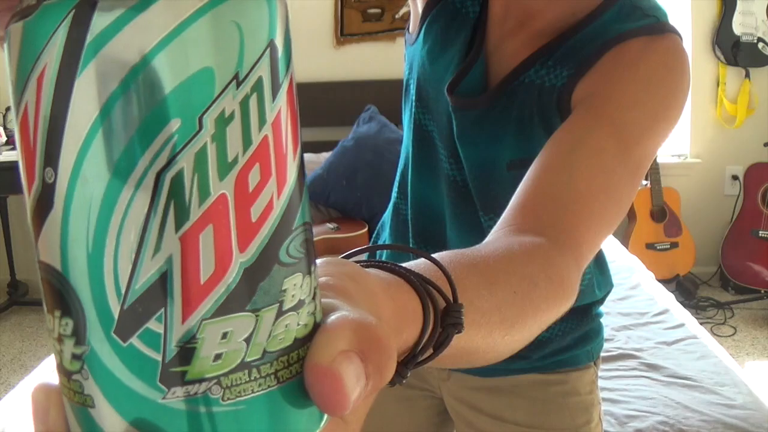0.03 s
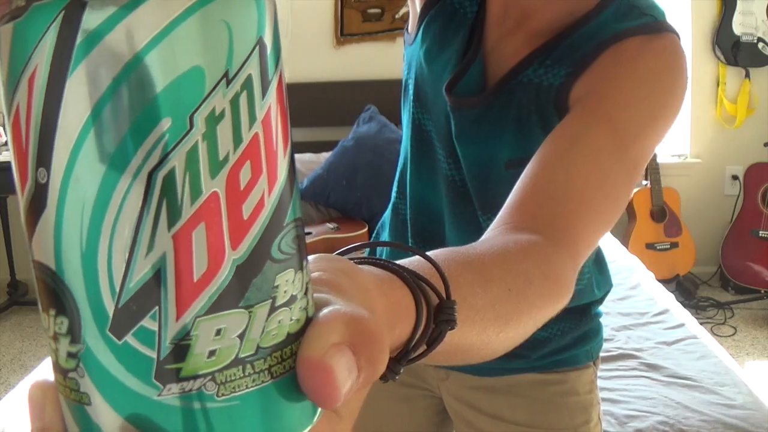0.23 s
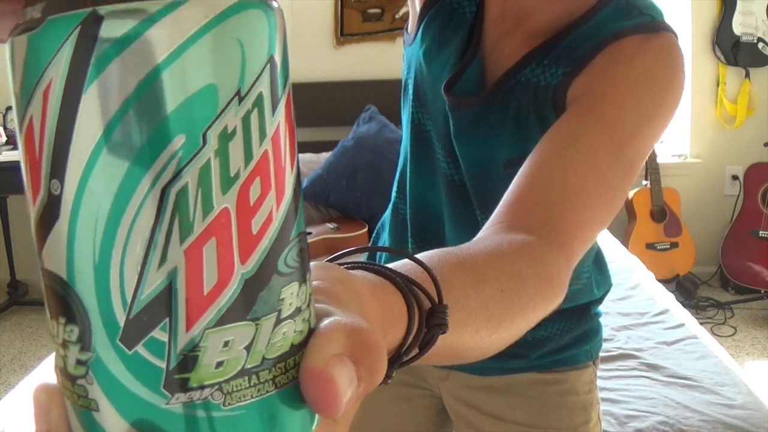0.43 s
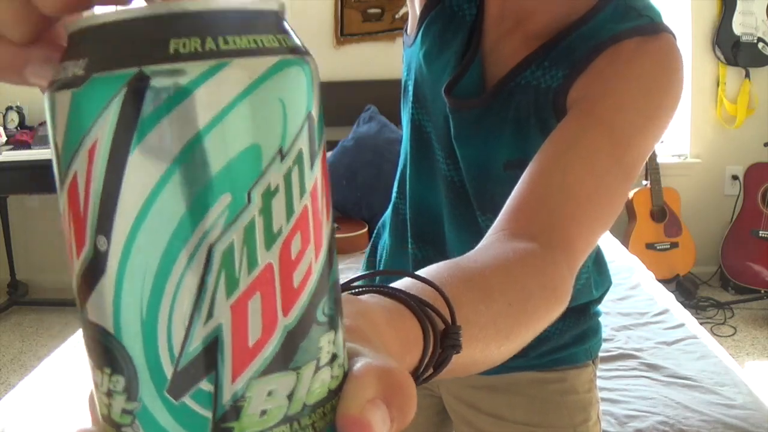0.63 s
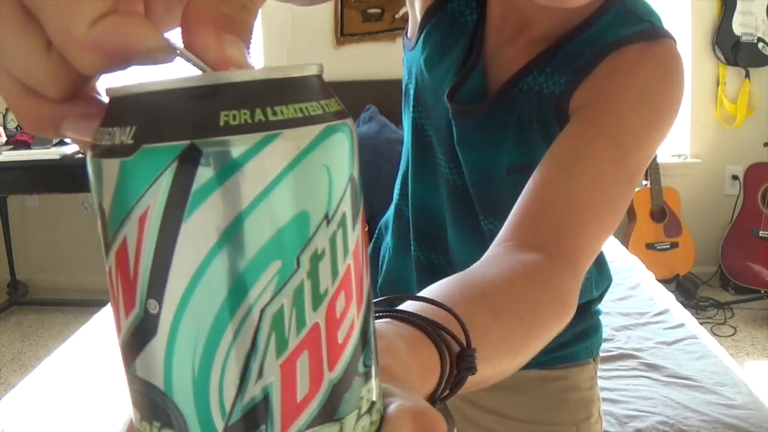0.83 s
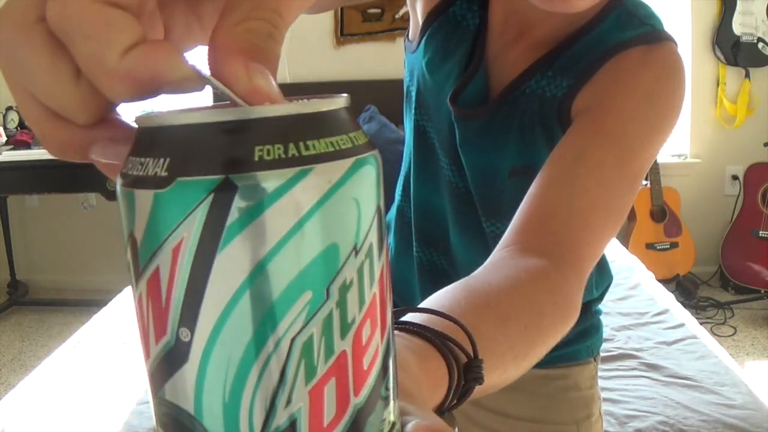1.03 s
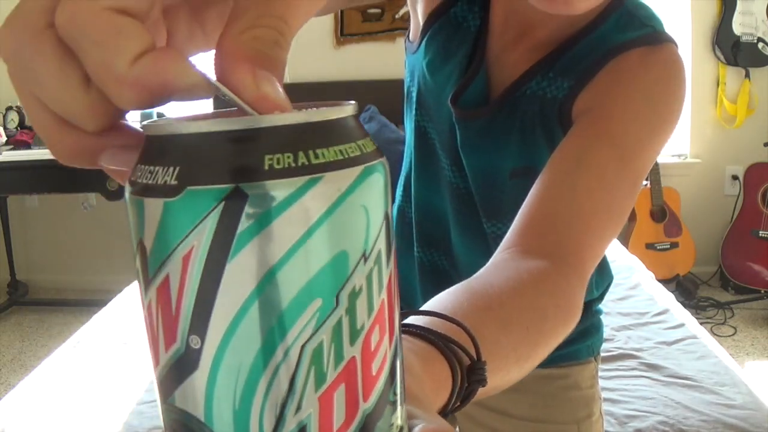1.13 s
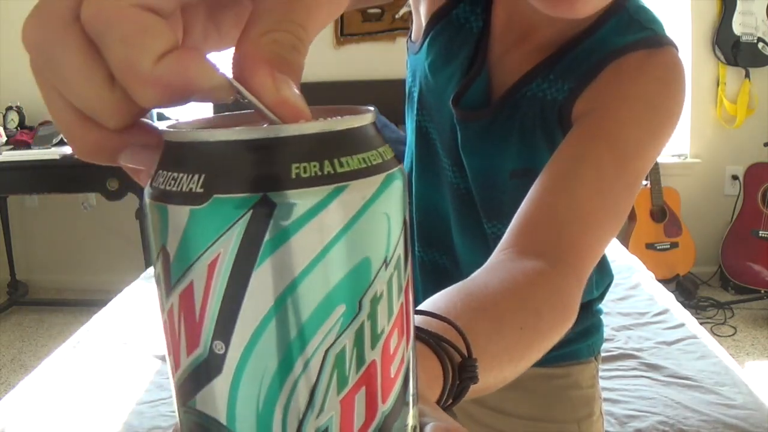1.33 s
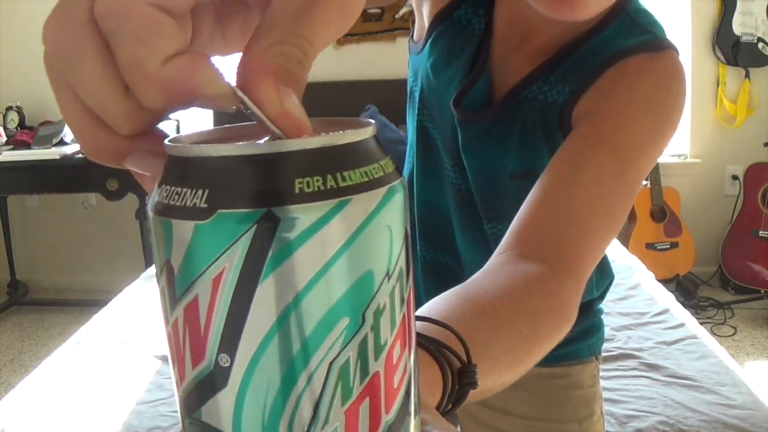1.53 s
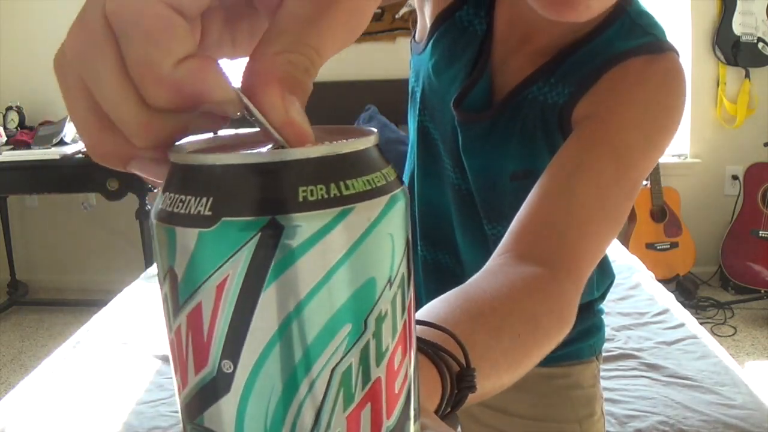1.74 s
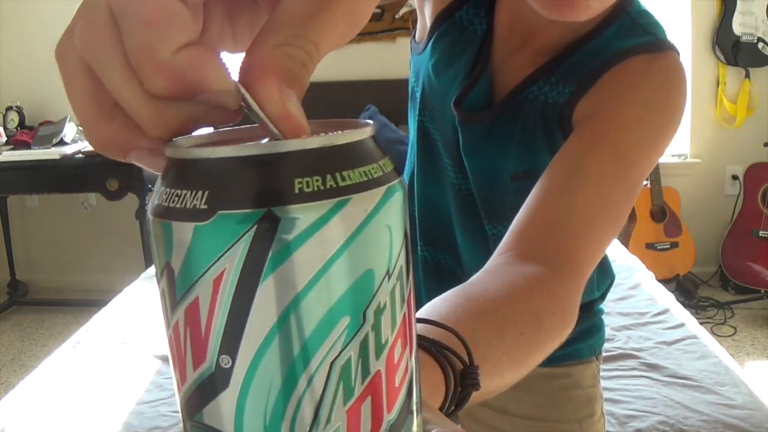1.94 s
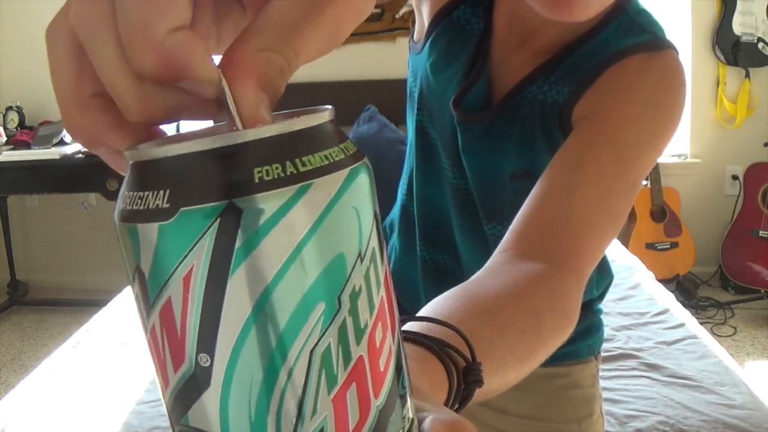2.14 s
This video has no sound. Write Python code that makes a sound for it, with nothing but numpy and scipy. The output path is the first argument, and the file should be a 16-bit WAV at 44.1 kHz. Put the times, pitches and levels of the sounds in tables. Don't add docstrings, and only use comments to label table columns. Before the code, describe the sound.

A soda can being opened: sharp metal tab clicks, a quick tearing crack, then hissing gas

```python
import sys
import numpy as np
from scipy import signal
from scipy.fft import rfft, irfft, next_fast_len
from scipy.io import wavfile
from scipy.ndimage import uniform_filter1d, map_coordinates

SR = 44100
rng = np.random.default_rng(int(sys.argv[2]) if len(sys.argv) > 2 else 0)


def volts_from_db(level):
    exponent = np.asarray(level, float) / 20
    return 10 ** exponent


def put_to_file(sound):
    columns = np.atleast_2d(sound).T
    safe = np.clip(columns, -1, 1)
    whole_steps = np.round(safe * 32767)
    wavfile.write(sys.argv[1], SR, whole_steps.astype(np.int16))


N = 96402

# [start_s, peak_db, tab_pitch_hz, treble_db, room_db]
NAIL_TICK = [
    (.1804, -40, 5300, -12, -19),
]
# [start_s, peak_db, tab_pitch_hz, treble_db, room_db]
TAB_LIFT = [
    (1.2494, -42.5, 4220, -6.5, -19),
    (1.3985, -2.5, 5800, -6.5, -11.5),
    (1.4706, -13.5, 5600, -6, -9),
    (1.5413, -21, 5450, -3, -10),
]
# [start_s, peak_db, tab_pitch_hz, treble_db, room_db]
RIVET_SNAP = [
    (1.4643, -1, 5630, 3, 2),
]
# [start_s, peak_db, tab_pitch_hz, treble_db, room_db]
TAB_BEND = [
    (1.7802, -6, 5150, 7, -5.5),
    (1.7884, -18.5, 5180, -2, 1.5),
    (1.8475, -16.5, 4130, -15, -24),
    (1.8533, -15, 4160, -5, -11.5),
    (1.8809, -25, 4300, -4, -27),
    (1.8918, -16.5, 4680, -0.5, -21),
    (1.9064, -29, 5400, -2, -22),
]
# [start_s, peak_db, tab_pitch_hz, treble_db, room_db]
SCORE_TEAR = [
    (2.0068, -11.5, 5140, -1.5, -12.5),
    (2.0359, -5, 4700, 3, -25.5),
    (2.0455, -17, 4360, -3, -3),
    (2.0547, -21, 4340, 8, -25),
    (2.0593, -7.5, 4550, 7, -8),
    (2.0688, -4.5, 3940, 7, -0.5),
    (2.074, -9, 5400, 11, -29),
    (2.0808, -18, 3850, -5, -15),
]
# [start_s, peak_db, tab_pitch_hz, treble_db, room_db]
LID_BURST = [
    (2.0822, -7, 5740, 0, -20),
    (2.0853, -1, 6000, 0, -1),
]

# [pitch_hz, width_hz, level_db]
LIFT_RINGS = [(1120, 1000, -32), (2040, 600, -18.5), (3990, 280, -3.5), (7800, 440, -5), (8700, 290, -1.5),
              (9830, 250, -3.5), (12490, 690, 4.5), (14400, 1700, -17.5)]
# [pitch_hz, width_hz, level_db]
SNAP_RINGS = [(2380, 1600, -28), (3970, 330, -10), (7500, 1100, -5), (9470, 620, 2.5), (12400, 1220, 9),
              (14700, 880, 1.5)]
# [pitch_hz, width_hz, level_db]
BEND_RINGS = [(706, 86, -25.5), (4680, 720, -7), (5880, 400, -7), (1490, 1600, -7.5), (2730, 450, -20.5),
              (6270, 390, -10), (7200, 790, -10), (8470, 680, -3), (9750, 365, -2.5), (12230, 690, -6),
              (14500, 790, -9.5)]
# [pitch_hz, width_hz, level_db]
TEAR_RINGS = [(816, 104, -21.5), (1400, 610, -11.5), (2820, 1440, -1), (6220, 400, -10.5), (8180, 260, -16),
              (9050, 340, -2.5), (10240, 380, -14), (12270, 430, -7), (14200, 650, -15)]
# [pitch_hz, width_hz, level_db]
BURST_RINGS = [(1300, 630, -20), (2790, 390, -2), (4100, 490, 2), (7340, 720, 6), (10120, 440, 5),
               (11500, 710, 10.5), (14500, 800, -8)]

# [freq_hz, t60_s]
ROOM_DECAY = [(500, 1), (3000, 0.36), (6000, 0.36), (10000, 0.35), (15000, 0.19)]
# [freq_hz, likeness_0_to_1]
ROOM_LIKENESS = [(1000, 0.78), (5000, 0.51), (9000, 0.75)]

# [time_s, level_db]
GAS_FLOW = [
    (2.085, -28.5),
    (2.096, -26),
    (2.11, -19),
    (2.135, -18.5),
    (2.16, -21),
    (2.186, -22),
]
# [freq_hz, density_db]
JET_SPECTRUM = [(300, -40), (550, -23.5), (1200, -5), (1950, -10), (3010, -4), (6470, -10), (14300, -6.5),
                (15200, -66)]
# [center_hz, width_hz, lift_db]
CAVITIES = [(1310, 1250, 5.5), (3560, 1340, 5), (9300, 2800, 5)]
# [freq_hz, likeness_0_to_1]
JET_LIKENESS = [(60, 1.0), (240, 0.47), (950, 0.74), (3770, 0.54), (15000, 1.0)]

# [center_s, level_db, length_s]
FINGERS = [
    (0.101, -61.5, 0.022),
    (0.787, -65, 0.01),
    (1.043, -65, 0.044),
    (1.15, -65, 0.034),
    (1.272, -65.5, 0.09),
]
# [freq_hz, density_db]
AIR_SPECTRUM = [(15, -23), (25, -5), (108, -1), (384, -11.5), (463, -12), (1440, -16.5), (2760, -19.5),
                (5000, -21.5), (16000, -23)]
# [freq_hz, likeness_0_to_1]
AIR_LIKENESS = [(60, 0.98), (180, 1), (550, 0.071), (1650, 0.057), (4970, 0.85), (15000, 1.0)]

# [start_s, depth_db]
GAIN_DIPS = [
    (1.3985, 2),
    (1.4663, -9),
    (1.7802, 0),
    (2.0833, -14),
]
# [freq_hz, difference_db]
MIC_BALANCE = [(120, 0), (300, -1.7), (1500, -1.1), (3000, -.6), (7000, 0)]

TAB_WIDTH_HZ, TAB_DB, TREBLE_HZ, RISE_S = 300, -1, 7000, 0.00015
CRACK_DB, CRACK_T60_S, CRACK_TOP_HZ, CRACK_IN_ROOM_DB = -6.5, 0.0022, 12100, 9
LID_CUT_HZ = 460
ROOM_SWELL_S, ROOM_BLUR_HZ, ROOM_BASS_CUT_HZ = 0.0027, 576, 1740
POP_S, SUCTION_DB, SUCTION_S, PUSH_DB, PUSH_S = 2.0864, -14.5, 0.0003, -23, 0.0021
AIR_DB, WHINE_HZ, WHINE_DB = -57, 15734, -60
FRAME_S, FIRST_S = 1001 / 30000, 0.15
BLIP_HZ, BLIP_DB, BLIP_S = 2748, -59, 0.0032
LOOK_AHEAD_S, RECOVER_S, MONO_ABOVE_HZ = 0.005, 0.017, 7400
START_S, FADE_S, TOP_HZ, CEILING = 0.08, 0.013, 15500, 0.85


def unit(x):
    return x / np.sqrt(np.mean(x ** 2) + 1e-20)


def along(points, hz):
    f, v = np.transpose(points)
    return np.interp(np.log(hz + 1), np.log(f + 1), v)


def filtered(x, response):
    m = next_fast_len(x.shape[-1] + 8192)
    spectrum = rfft(x, m) * response(np.fft.rfftfreq(m, 1 / SR))
    return irfft(spectrum, m)[..., :x.shape[-1]]


def rush(level_db, alike, patchy_db):
    z = signal.stft(rng.standard_normal((2, N)), nperseg=256)[2]
    field = uniform_filter1d(rng.standard_normal(z.shape[1:]), size=4, axis=0)
    field = uniform_filter1d(field, size=4, axis=1)
    pair = signal.istft(z * volts_from_db(patchy_db * unit(field)), nperseg=256)[1][:, :N]

    def mid_side_gain(hz):
        turn = np.arccos(np.clip(along(alike, hz), -1, 1)) / 2
        return volts_from_db(level_db(hz)) * [np.cos(turn), np.sin(turn)]

    mid, side = filtered(pair, mid_side_gain)
    return unit(np.array([mid + side, mid - side]))


def clicks(events, modes):
    out = np.zeros((2, 2, N + SR))
    t = np.arange(SR // 30) / SR
    lid = signal.butter(3, LID_CUT_HZ, "high", fs=SR, output="sos")
    thin = signal.butter(2, CRACK_TOP_HZ, fs=SR, output="sos")
    for start_s, peak_db, tab_hz, treble_db, room_db in events:
        crack = signal.sosfilt(thin, rng.standard_normal(len(t)))
        crack *= volts_from_db(CRACK_DB + treble_db / 2 - 60 * t / CRACK_T60_S)
        ring = np.zeros((2, len(t)))
        for k, (hz, width_hz, level_db) in enumerate(sorted([(tab_hz, TAB_WIDTH_HZ, TAB_DB), *modes])):
            treble = hz > TREBLE_HZ
            gain = (-1) ** k * volts_from_db(level_db + treble_db * treble + rng.normal(0, 1.1))
            widths_hz = width_hz + treble * np.array([[0], [ROOM_BLUR_HZ]])
            tone = np.sin(2 * np.pi * hz * (1 + rng.normal() / 100) * t)
            ring += gain * np.exp(-np.pi * widths_hz * t) * tone
        source = ring + crack * volts_from_db([[0], [CRACK_IN_ROOM_DB]])
        near, far = signal.sosfilt(lid, source * (1 - np.exp(-t / RISE_S)))
        size = volts_from_db(peak_db) / np.abs(near).max()
        wet = volts_from_db(room_db) * size * signal.fftconvolve(far[None], room_tail(), axes=1)
        first = round(start_s * SR)
        out[0, :, first:][:, :len(t)] += size * near * volts_from_db([[0.6], [-0.6]])
        out[1, :, first:][:, :wet.shape[1]] += wet
    return out[..., :N]


def room_tail():
    hz, t, z = signal.stft(rng.standard_normal((2, SR // 2)), SR, nperseg=128)
    turn = np.arccos(np.clip(along(ROOM_LIKENESS, hz), 0, 1))[:, None] / 2
    pair = np.cos(turn) * z[0] + np.sin(turn) * z[1] * np.array([1, -1])[:, None, None]
    bass_cut = (hz ** 2 / (hz ** 2 + ROOM_BASS_CUT_HZ ** 2))[:, None]
    decay = volts_from_db(-60 * t / along(ROOM_DECAY, hz)[:, None])
    tail = signal.istft(pair * bass_cut * decay, SR, nperseg=128)[1]
    tail = tail * (1 - np.exp(-np.arange(tail.shape[1]) / SR / ROOM_SWELL_S))
    return tail / np.linalg.norm(tail[0])


def pop():
    t = np.arange(N) / SR - POP_S
    after = np.maximum(t, 0) / PUSH_S
    push = after * np.exp(1 - after) - 0.15 * after / 5 * np.exp(1 - after / 5)
    suction = np.exp(-(t / SUCTION_S) ** 2)
    return volts_from_db(PUSH_DB) * push - volts_from_db(SUCTION_DB) * suction


def gas():
    def colour(hz):
        lift = sum(db / (1 + (2 * (hz - center) / width) ** 2) for center, width, db in CAVITIES)
        return along(JET_SPECTRUM, hz) + lift

    time_s, level_db = np.transpose(GAS_FLOW)
    flow = volts_from_db(np.interp(np.arange(N) / SR, time_s, level_db, left=-200))
    spit = map_coordinates(rng.standard_normal(N // 40 + 4), [np.arange(N) / 40])
    return flow * unit(volts_from_db(1.5 * spit) * rush(colour, JET_LIKENESS, patchy_db=1.5))


def finger_rustle():
    t = np.arange(N) / SR
    touch = sum(volts_from_db(db) * np.exp(-((t - s) / length) ** 2) for s, db, length in FINGERS)
    spectrum = [(1500, -23), (5000, -3), (9500, 0.5), (15000, -35)]  # Hz, dB
    return touch * rush(lambda hz: along(spectrum, hz), [(100, 1.0)], patchy_db=2.5)


def frame_blip():
    t = np.arange(N) / SR
    since = (t - FIRST_S + FRAME_S / 4) % FRAME_S - FRAME_S / 4
    return volts_from_db(BLIP_DB) * np.exp(-(since / BLIP_S - 0.7) ** 2) * np.sin(2 * np.pi * BLIP_HZ * since)


def line_whine():
    t = np.arange(N) / SR
    waver = map_coordinates(rng.standard_normal(70), [t * 28])
    return volts_from_db(WHINE_DB + 1.6 * waver) * np.sin(2 * np.pi * WHINE_HZ * t)


def room_air():
    return volts_from_db(AIR_DB) * rush(lambda hz: along(AIR_SPECTRUM, hz), AIR_LIKENESS, patchy_db=0.7)


def gain_control():
    t = np.arange(N) / SR
    gain_db = np.zeros(N)
    for start_s, depth_db in GAIN_DIPS:
        onset = np.clip(2 * (t - start_s) / LOOK_AHEAD_S + 2, 0, 1)
        recovery = np.exp(-(np.maximum(t - start_s, 0) / RECOVER_S) ** 2)
        gain_db += depth_db * onset * recovery
    return volts_from_db(gain_db)


def narrowed(x):
    side = filtered((x[0] - x[1]) / 2, lambda hz: hz > MONO_ABOVE_HZ)
    return x - side * np.array([[1], [-1]])


def scene():
    near, room = (clicks(NAIL_TICK, [(4500, 540, 0), (5950, 530, 0)])
                  + clicks(TAB_LIFT, LIFT_RINGS) + clicks(RIVET_SNAP, SNAP_RINGS)
                  + clicks(TAB_BEND, BEND_RINGS) + clicks(SCORE_TEAR, TEAR_RINGS)
                  + clicks(LID_BURST, BURST_RINGS))
    background = finger_rustle() + frame_blip() + line_whine() + room_air()
    return near + pop() + narrowed(gas() + gain_control() * (room + background))


def roll_off(x):
    return signal.sosfilt(signal.butter(12, 16520, fs=SR, output="sos"), x)


def record(dry):
    def mics(hz):
        balance = volts_from_db(along(MIC_BALANCE, hz) / 2 * np.array([[1], [-1]]))
        return balance / (1 + (hz / TOP_HZ) ** 60) * hz / (hz + 15)

    heard = filtered(dry, mics)
    limited = heard / (1 + np.abs(heard / CEILING) ** 6) ** (1 / 6)
    fade = np.clip((np.arange(N) / SR - START_S) / FADE_S, 0, 1)
    return roll_off(limited * fade)


dry = scene()
out = record(dry)
put_to_file(out)
```